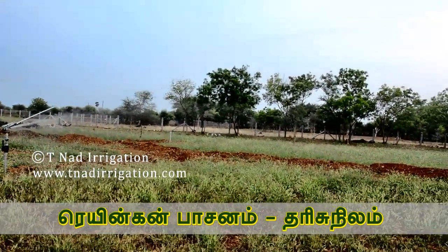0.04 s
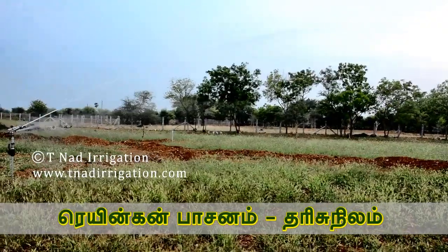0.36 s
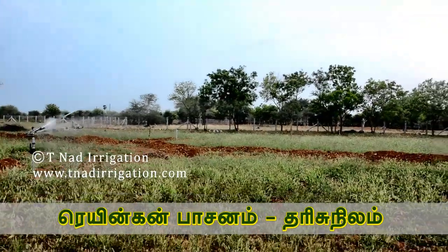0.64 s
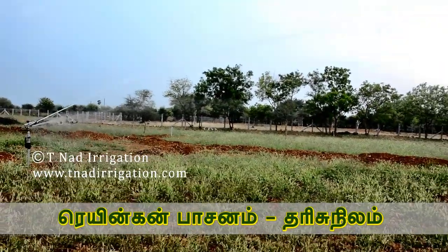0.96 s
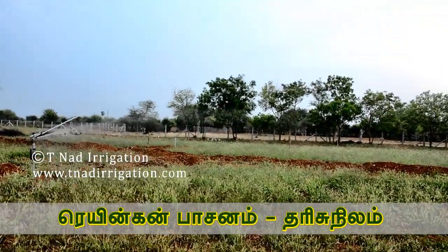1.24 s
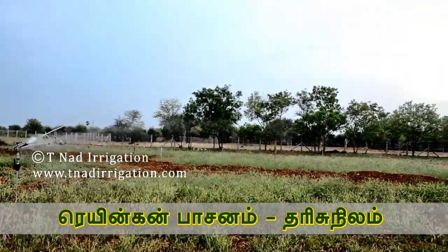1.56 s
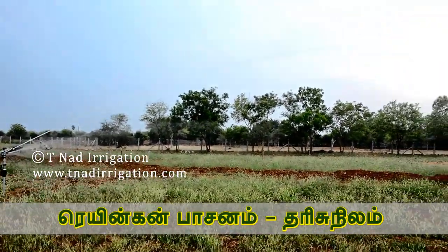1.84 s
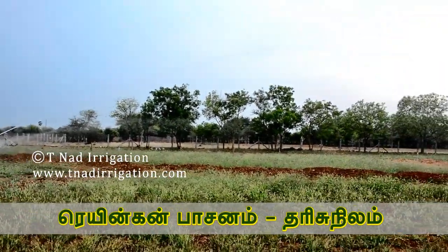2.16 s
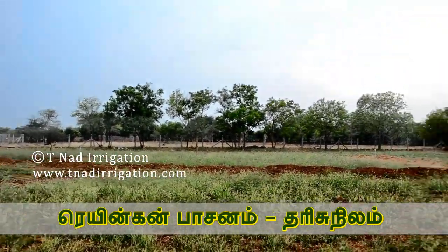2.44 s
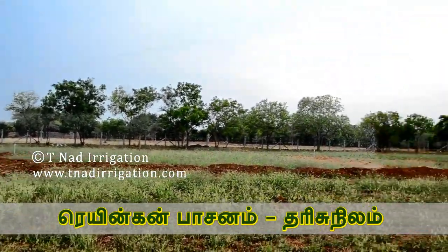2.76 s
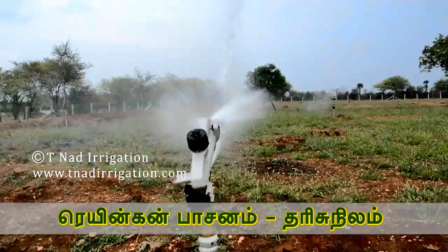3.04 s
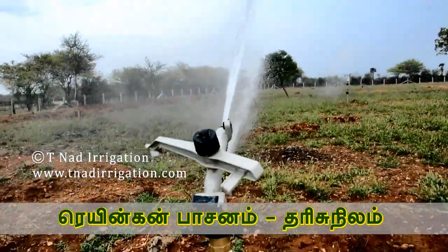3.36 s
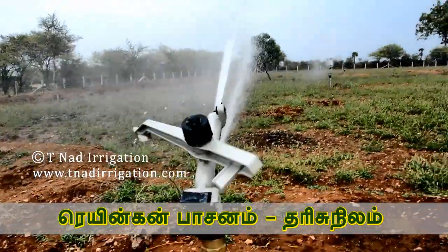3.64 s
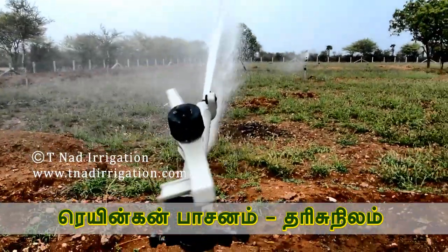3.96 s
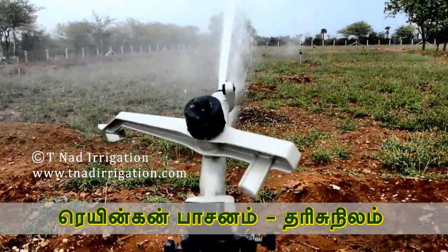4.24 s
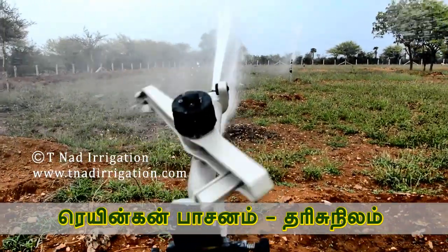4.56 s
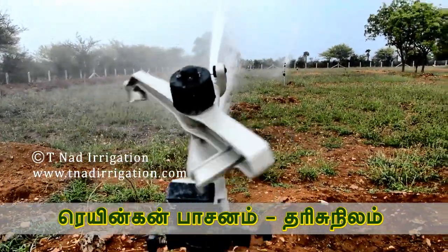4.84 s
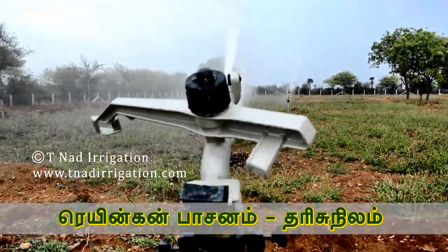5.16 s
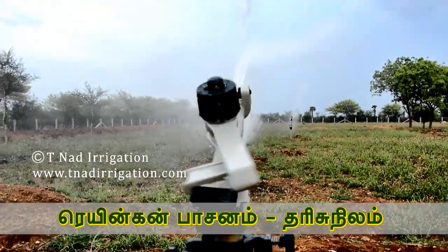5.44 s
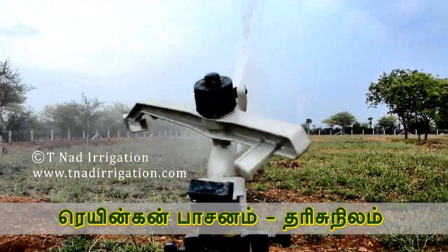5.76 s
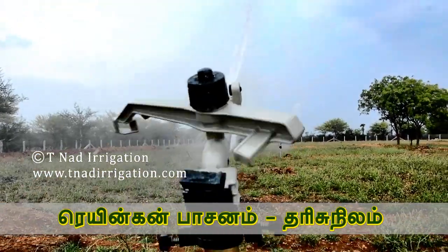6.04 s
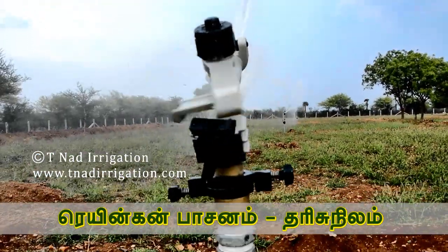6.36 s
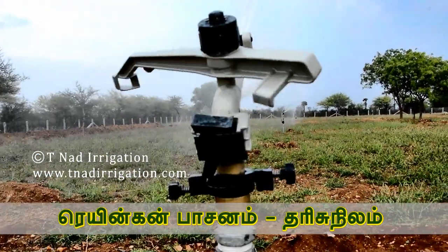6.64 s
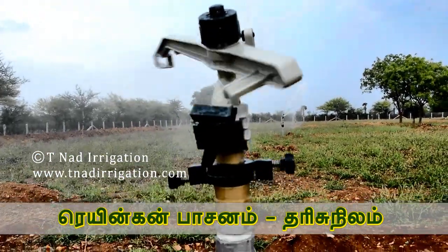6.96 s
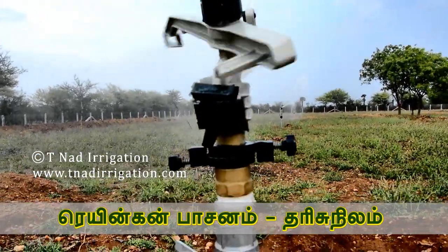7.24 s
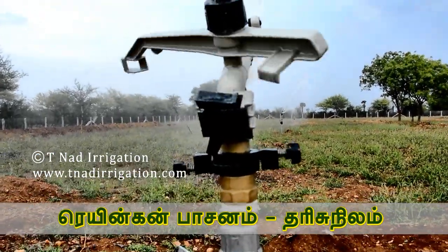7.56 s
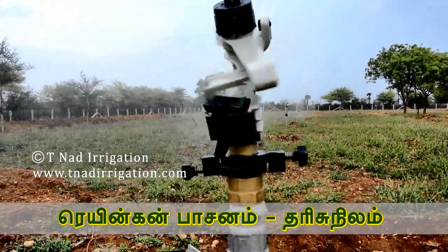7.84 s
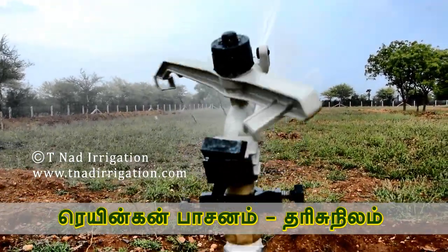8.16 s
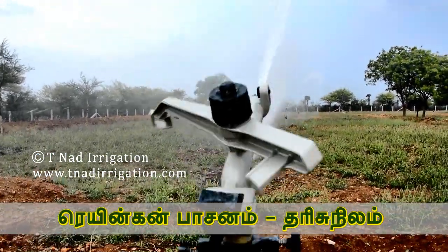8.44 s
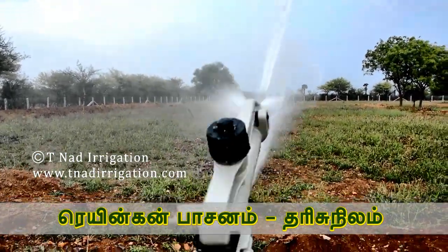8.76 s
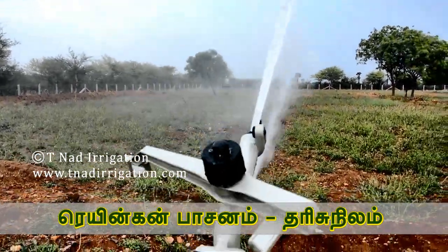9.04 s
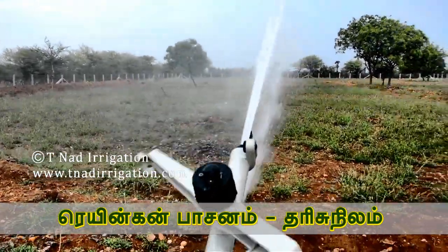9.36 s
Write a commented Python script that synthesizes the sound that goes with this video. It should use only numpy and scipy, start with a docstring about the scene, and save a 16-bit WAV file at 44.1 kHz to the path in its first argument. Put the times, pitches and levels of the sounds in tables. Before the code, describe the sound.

A large sprinkler waters an open field, its swinging arm ticking in a quick, even metallic rhythm over a soft, distant water hiss. A small bird trills faintly. After about three seconds the sound jumps right beside the sprinkler: the arm slams about twice a second with loud, ringing, slightly distorted clanks, the jet hisses and spatters, and wind rumbles on the microphone.

```python
"""A rain gun waters a field

The jet kicks a swinging arm out, and the arm slams back about twice a second. Each blow rings the
metal head and two long, pulsing tones. The jet hisses, small knocks come and go, and a bird trills.
We listen from across the grass and then, from 3.07 s, right beside the gun. There wind buffets the
microphone, and the blows overload it and briefly push the hiss down."""
import sys
import numpy as np
from scipy import signal
from scipy.fft import rfft, irfft
from scipy.io import wavfile
from scipy.ndimage import uniform_filter1d, map_coordinates

SR = 44100
rng = np.random.default_rng(int(sys.argv[2]) if len(sys.argv) > 2 else 0)


def waveform_to_disk(signal):
    """Save audio, clipped to [-1, 1], as 16-bit WAV at the path in sys.argv[1]."""
    frames = np.transpose(np.atleast_2d(signal))
    scaled = np.clip(frames, -1, 1) * 32767
    samples = np.round(scaled).astype(np.int16)
    wavfile.write(sys.argv[1], SR, samples)


N = 422919
TIME = np.arange(N) / SR

# the arm slams on its stop: (time [s], force [dB], body [dB], clank [dB], lower long tone [dB],
# upper long tone [dB]); body is the low part of the sound, clank the part at 3-4 kHz
ARM_SLAMS = [(0.364, 0, 4, 0, -33.5, -42), (0.819, -1.5, 4, 1, -38, -34.5), (1.278, 0, 3.5, -0.5, -32, -44),
             (1.733, 0, 1, 1, -45, -35), (2.193, -0.5, 3.5, 2.5, -40, -37), (2.647, -2, 5, 4.5, -34.5, -44),
             (3.209, -1, 0.5, 1, -24, -23), (3.684, 2, -2, 1.5, -29.5, -35),
             (4.16, 0, -1.5, -0.5, -19, -25.5), (4.636, -0.5, -1, 0, -24, -27),
             (5.112, 2.5, 1, 0.5, -24, -21.5), (5.589, 0, 0, 0.5, -18.5, -20.5),
             (6.067, -1.5, 0, -1.5, -20.5, -20.5), (6.544, 1, 0, -0.5, -27, -19.5),
             (7.022, 2, 2.5, -1.5, -34.5, -40), (7.503, 0, 0, 0.5, -26, -24.5),
             (7.976, 0.5, -1.5, 1.5, -28.5, -22.5), (8.454, 0, 1, 2.5, -31.5, -24),
             (8.928, 0.5, -2, 2, -23, -25.5), (9.402, 1.5, -4.5, 1, -25, -22.5)]
# the lighter kick between slams, heard only from afar: (time [s], force [dB])
ARM_KICKS = [(0.131, 0.5), (0.584, 0.5), (1.036, 0), (1.49, 0), (1.945, 0.5), (2.401, 0), (2.856, -1.5)]
# loose chatter of the arm: (time [s], force [dB])
ARM_CHATTER = [(3.158, -17.5), (3.619, -18.5), (6.643, -8), (6.663, -9), (6.671, -25), (6.684, -13.5),
               (6.745, -19), (8.785, -21)]
# noisy crack of a blow: (frequency [Hz], far slam [dB], far kick [dB], close slam [dB])
CRACK_COLOUR = [(60, -29, -34, -23), (300, -13, -18, 13), (710, -5.5, -22, 11.5), (1320, 3, 4, 25.5),
                (3020, 14, 3.5, 23), (6560, 7.5, -3, 21.5), (11200, 1, -11, 17.5), (15300, -9, -11, 13.5)]
# tones of the head: (pitch [Hz], time to fade 60 dB [s], far slam [dB], far kick [dB], close slam [dB])
HEAD_TONES = [(690.0, 0.076, -44.0, -60.0, -23.0), (1001, 0.051, -35, -37, -4.5),
              (1070, 0.065, -38, -40, -9), (1135, 0.07, -46, -42, -10), (1625, 0.06, -38, -50, -16),
              (1830, 0.05, -19, -26, -20), (1959, 0.053, -32, -45, -7), (3057, 0.085, -43, -25, -10),
              (3245, 0.055, -32, -35, -11.5), (3560, 0.04, -23, -23, -9), (3925, 0.1, -33, -30, -22),
              (4242, 0.05, -17, -51, -27), (4330, 0.13, -32, -41, -24.5),
              (4800.0, 0.064, -42.0, -41.0, -23.0), (5076.0, 0.03, -26.0, -59.0, -19.0),
              (5620.0, 0.03, -19.0, -36.0, -15.0), (5740.0, 0.047, -29.0, -26.0, -11.0),
              (6078, 0.13, -50, -45, -21), (6190, 0.14, -34, -55, -23),
              (6730.0, 0.042, -21.0, -58.0, -11.5), (7003.0, 0.035, -32.0, -56.0, -11.0),
              (7560.0, 0.056, -41.0, -35.0, -17.5), (8460, 0.17, -24, -59, -30),
              (8532.0, 0.058, -29.0, -43.0, -14.5), (9178, 0.12, -49, -54, -25),
              (9280, 0.08, -21, -60, -40), (9730.0, 0.053, -22.0, -35.0, -17.0),
              (11760, 0.07, -27, -49, -26), (12354.0, 0.064, -33.0, -48.0, -17.0),
              (13668, 0.1, -60, -55, -29)]
# long tones of the arm: (pitch [Hz], time to fade 60 dB [s])
ARM_TONES = [(2578, .54), (2824, .58)]
# how much the two sides of the microphone differ on a blow: (frequency [Hz], level [dB])
SIDE_COLOUR = [(1200, -59), (3500, -16.5), (9000, -21.0)]
# the close jet as the microphone moves round it: (time [s], roar [dB], spray [dB])
CLOSE_JET_LEVELS = [(3.51, -36.5, -30.5), (3.98, -34.5, -29.5), (4.94, -34, -28), (6.37, -34.5, -29.5),
                    (7.32, -34, -29), (8.28, -34.5, -27), (9.23, -34, -30.5)]
# tone colour of the jet, far and close: (frequency [Hz], level [dB])
FAR_JET_COLOUR = [(29, -48), (50, -17), (310, -7), (404, -6.5), (551, -4.5), (735, -2), (1110, -1.5),
                  (1470, -1.5), (1740, -3), (4240, -7.5), (6690, -12.5), (7190, -11), (7920, -13),
                  (15500, -10.5)]
CLOSE_JET_COLOUR = [(180, -28), (300, -6), (907, -6.5), (1140, -2), (1440, -4.5), (1640, 1.5), (2280, -5),
                    (2520, -4), (3280, -3), (3630, -7.5), (4280, -3.5), (5850, -4), (7250, -2.5),
                    (9760, -5.5), (15500, -4)]
# a peak and two dips that the head puts in the close hiss: (frequency [Hz], width [Hz], gain [dB])
HEAD_HUM = [(1116, 57, 5.5), (1670, 180, -4), (2820, 1200, -5)]
# a near echo of the hiss, shifting as the microphone moves: (time [s], delay [ms])
ECHO_DELAYS = [(3.2, 1.28), (3.8, 1.42), (5.2, 1.27), (5.6, 1.08), (6.5, 1.05), (6.9, 1.12), (7.9, .97),
               (8.4, 1.05), (9.1, 1.07), (9.4, 1.25)]
# faint ticks, thuds, rustles and arm bounces: (time [s], level [dB], centre [Hz], fade time [s])
SMALL_KNOCKS = [(0.164, -47, 450, 0.0097), (0.43, -34, 2600, 0.0083), (0.753, -37.5, 546, 0.0083),
                (0.872, -35, 2790, 0.011), (2.738, -27, 2430, 0.0037), (2.758, -39, 700, 0.028),
                (2.79, -37.5, 603, 0.016), (2.986, -43, 550, .018), (3.583, -14, 9000, .0007),
                (3.877, -24, 9000, .001)]
# strength of the wind on the microphone: (time [s], level [dB])
GUSTS = [(3.1, -39), (3.5, -33), (3.58, -52), (3.82, -59.0), (4.38, -35.5), (4.94, -52), (5.1, -32),
         (5.34, -37), (5.74, -27.5), (5.82, -37.5), (6.06, -34), (6.14, -41), (6.3, -31.5), (7.02, -43.5),
         (7.1, -63), (7.26, -39), (8.78, -43), (9.1, -42.5), (9.26, -56), (9.58, -54.1)]
# tone colour of the wind: (frequency [Hz], level [dB])
GUST_COLOUR = [(12, -57), (20, -21), (141, 2), (195, -1), (225, -1), (282, -7), (506, -20), (600, -14),
               (780, -46), (1320, -120)]
# whistles in the far hiss: (start [s], end [s], start pitch [Hz], end pitch [Hz], width [Hz], level [dB])
HISS_WHISTLES = [(0.273, 0.394, 1350, 1620, 190, -47), (0.367, 0.56, 1900, 1620, 300, -47.5),
                 (0.799, 1.1, 1400, 1390, 18, -51), (.9, 1.193, 180, 249, 40, -60),
                 (1.2, 1.42, 1350, 1550, 290, -47), (1.331, 1.55, 1900, 1750, 250, -48),
                 (1.2, 2.203, 1195, 1210, 19, -55), (2.151, 2.655, 1600, 1564, 19, -57)]
# loudness of the bird's trill: (time [s], level [dB])
BIRD_LEVELS = [(1.8, -58), (2.1, -57), (2.5, -51), (2.85, -45), (3.0, -54)]

FAR_SLAM, FAR_KICK, CLOSE_SLAM = 0, 1, 2  # kinds of blow: each picks a level column
STEP_CLOSE_S, LEAD_S = 3.07, 0.02  # when we move close; how early a blow's sound starts
KICK_TONES_DB = -58  # a kick hardly wakes the long tones
FAR_ROAR_DB, FAR_SPRAY_DB = -47.5, -45
BUFFET_PER_S, BUFFET_DB = 18, 2.1  # swirls within a gust, felt on both sides
GAIN_CONTROL_DB, GAIN_CONTROL_S = -11, 0.14  # level at which the power is halved; memory
TOP_HZ = 15750


def arm():
    """The swinging arm strikes again and again: slams, kicks and loose chatter."""
    out = np.zeros(N)
    for s, force_db, body_db, clank_db, *tones_db in ARM_SLAMS:
        if s < STEP_CLOSE_S:
            hit = blow(FAR_SLAM, body_db, clank_db, treble_db=1.3,
                       crack_db=0.5, ring_db=-2, crack_s=0.01, rebound_db=-12)
        else:
            hit = blow(CLOSE_SLAM, body_db, clank_db, treble_db=0.5,
                       crack_db=1.76, ring_db=1.2, crack_s=0.012, rebound_db=-12.5)
        add(out, s - LEAD_S, undb(force_db) * hit)
        add(out, s, long_tones(tones_db))
    for s, force_db in ARM_KICKS:
        hit = blow(FAR_KICK, body_db=0, clank_db=0.5, treble_db=0,
                   crack_db=0.9, ring_db=-1.1, crack_s=0.0088, rebound_db=-19)
        add(out, s - LEAD_S, undb(force_db) * hit)
        add(out, s, long_tones([KICK_TONES_DB, KICK_TONES_DB]))
    for s, force_db in ARM_CHATTER:
        hit = blow(CLOSE_SLAM, body_db=-4, clank_db=-0.5, treble_db=-10,
                   crack_db=-4, ring_db=-7, crack_s=0.0097, rebound_db=-15)
        add(out, s - LEAD_S, undb(force_db) * hit)
    return out


def blow(kind, body_db, clank_db, treble_db, crack_db, ring_db, crack_s, rebound_db):
    """One blow: the arm's tip cuts the jet, the metal faces rattle together, the arm bounces."""
    size = 16384
    t = np.arange(size) / SR - LEAD_S
    after, hz = np.maximum(t, 0), bins(size)
    tone = [(1300, body_db), (2000, 0), (3000, clank_db), (4000, clank_db), (6000, treble_db)]
    lead = undb(-13.5) * np.exp(np.minimum(t, 0) / 0.0053) * (t < 0)
    tail = undb(-19) * np.exp(-after / .024)
    first_contact = undb(-1.5) * np.exp(-after / 0.0011)
    rattle = (first_contact + np.exp(-after / crack_s) + tail) * (t >= 0)
    burst = unit((lead + rattle) * rng.standard_normal(size)) / np.sqrt(size)
    crack = shape(burst, colour(np.array(CRACK_COLOUR)[:, [0, 1 + kind]], hz) * colour(tone, hz))
    out = undb(crack_db) * crack + undb(ring_db) * head_ring(kind, tone, after)
    # two softer bounces mostly knock the hollow body
    soft = [(1000, body_db - 3), (1100, body_db + 6), (1700, -9),
            (3100, clank_db + 2), (4000, -7), (9000, -9)]
    for lag_s, drop_db in ((.023, 0), (.064, -9)):
        since_bounce = np.maximum(t - lag_s - rng.random() / 150, 0)
        out += undb(rebound_db + drop_db) * head_ring(kind, soft, since_bounce)
    return out


def head_ring(kind, tone, t):
    """The head rings; the arm lands a little differently each time and a film of water detunes it."""
    modes = np.array(HEAD_TONES)
    chance = rng.standard_normal((len(modes), 3))
    gain = undb(modes[:, 2 + kind] + 3.45 * chance[:, 0]) * colour(tone, modes[:, 0])
    hz = modes[:, :1] + 7 * chance[:, 1:2]
    tones = beating_pair(hz, fade_s=modes[:, 1:2], phase=chance[:, 2:], t=t, partner=.45)
    attack = 1 - np.exp(-t / .0006)
    return gain @ tones * attack


def long_tones(levels_db):
    """Two slowly fading tones of the arm sing on after the blow."""
    t = np.arange(SR // 2) / SR
    return sum(undb(db) * beating_pair(hz, fade_s, rng.random(), t, partner=1)
               for (hz, fade_s), db in zip(ARM_TONES, levels_db))


def beating_pair(hz, fade_s, phase, t, partner):
    """A tone and a slightly higher partner drift in and out of step, so they pulse as they fade."""
    beat = 2 * np.pi * 1.9 * t / fade_s
    turn = 2 * np.pi * (hz * t + phase)
    return (np.sin(turn) - partner * np.sin(turn + beat)) * np.exp(-np.log(1000) * t / fade_s)


def jet(roar_db, spray_db, gain, drop_db, flutter_db, surge_db, side_db):
    """The stream roars and breaks into fluttering spray; single drops tick through it."""
    high = 1 / (1 + (4500 / bins(N)) ** 8)  # spray lies above 4500 Hz, roar below
    ticks = rng.random(N) < 700 / SR  # about 700 drops a second
    sizes = undb(4.5 * np.minimum(rng.exponential(size=N), 3.5))
    drops = ticks * sizes * rng.choice([-1, 1], N)
    roar = noise(gain * (1 - high)) * undb(roar_db + flutter_db * wander(60))
    spray = unit(shape(rng.standard_normal(N) + undb(drop_db) * unit(drops), gain * high))
    spray *= undb(spray_db + flutter_db * wander(200))
    mist = noise(gain) * undb(roar_db + side_db)
    return stereo((roar + spray) * undb(surge_db * wander(10)), mist)


def with_echo(hiss):
    """A weak, shifting echo lifts some pitches of the hiss and thins others."""
    lag_ms, = curves(ECHO_DELAYS)
    late = np.arange(N) - lag_ms * SR / 1000
    return hiss + .24 * np.array([map_coordinates(side, [late], order=3) for side in hiss])


def small_knocks():
    """Short bursts of noise: faint ticks, dull thuds, rustles, arm bounces and an odd droplet click."""
    out, t = np.zeros(N), np.arange(SR // 8) / SR
    for s, db, hz, decay_s in SMALL_KNOCKS:
        band = 1 / (1 + (np.log(bins(len(t)) / hz) / 0.42) ** 2)
        add(out, s, undb(db) * noise(band, len(t)) * np.exp(-t / decay_s))
    return out


def wind():
    """Gusts break into swirls that buffet each side of the microphone, mostly on its own."""
    gust_db, = curves(GUSTS)
    gain = colour(GUST_COLOUR, bins(N)) / (1 + (bins(N) / 600) ** 4)
    shared, left, right = (noise(gain) * undb(3 * wander(36)) for _ in range(3))
    sides = np.array([0.23 * shared + 0.58 * left, 0.27 * shared + 0.82 * right])
    return undb(gust_db + BUFFET_DB * wander(BUFFET_PER_S)) * sides


def whistles():
    """Faint, narrow bands of noise swell, glide and fade."""
    out = np.zeros(N)
    for start, end, from_hz, to_hz, width_hz, db in HISS_WHISTLES:
        progress = np.linspace(0, 1, int((end - start) * SR))
        turn = 2 * np.pi * np.cumsum(from_hz + (to_hz - from_hz) * progress) / SR
        waver = sum(wander(width_hz)[:len(turn)] * wave(turn) for wave in (np.cos, np.sin))
        add(out, start, undb(db) * unit(waver) * np.sin(np.pi * progress))
    return out


def bird():
    """A small bird sings a fast trill of thin, arched notes."""
    db, = curves(BIRD_LEVELS)
    note = (TIME * 21.2) % 1  # runs from 0 to 1 in each note
    hz = 7350 - 1300 * (note - .55) ** 2 + 25 * wander(16)
    singing = (TIME > BIRD_LEVELS[0][0]) & (TIME < BIRD_LEVELS[-1][0])
    return singing * undb(db) * np.sin(np.pi * note) ** 2 * np.sin(2 * np.pi * np.cumsum(hz) / SR)


def undb(db):
    """Turn decibels into a gain."""
    return 10 ** (np.asarray(db) / 20)


def unit(x):
    """Scale to an average power of one."""
    return x / np.sqrt(np.mean(x ** 2))


def curves(rows):
    """Join a table's points into one line in time for each value column."""
    s, *columns = np.transpose(rows)
    return [np.interp(TIME, s, c) for c in columns]


def bins(size):
    """The frequencies in a spectrum of this many samples."""
    return np.maximum(np.arange(size // 2 + 1) * SR / size, 1)


def colour(points, hz):
    """Join (frequency [Hz], level [dB]) points into a gain for each frequency."""
    f, db = np.transpose(points)
    return undb(np.interp(np.log(hz), np.log(f), db))


def shape(x, gain):
    """Filter by a gain for each frequency."""
    return irfft(rfft(x) * gain, x.shape[-1])


def noise(gain, size=N):
    """Filtered noise with a power of one."""
    return unit(shape(rng.standard_normal(size), gain))


def wander(rate):
    """A smooth random line that heads for a new value `rate` times a second."""
    hold = int(SR / rate)
    steps = np.repeat(rng.standard_normal(N // hold + 1), hold)
    return unit(uniform_filter1d(uniform_filter1d(steps, hold), hold)[:N])


def add(out, s, x):
    """Mix a sound in at s seconds."""
    i = int(s * SR)
    out[i:i + len(x)] += x[:max(N - i, 0)]


def stereo(mid, side):
    """Left and right from what they share and how they differ."""
    return np.array([mid + side, mid - side])


def scene():
    """Far off the gun stands a little to the left; close up it is straight ahead."""
    hz = bins(N)
    humming = undb(sum(db / (1 + (2 * (hz - f) / width) ** 2) for f, width, db in HEAD_HUM))
    low_cut = 1 / (1 + (70 / hz) ** 4)
    far_jet = jet(FAR_ROAR_DB, FAR_SPRAY_DB, colour(FAR_JET_COLOUR, hz) * low_cut,
                  drop_db=-7, flutter_db=1, surge_db=-0.03, side_db=-16)
    close_jet = jet(*curves(CLOSE_JET_LEVELS), colour(CLOSE_JET_COLOUR, hz) * humming,
                    drop_db=-1.5, flutter_db=1.35, surge_db=0.82, side_db=-35)
    blows = arm() + small_knocks()
    blows = stereo(blows, shape(blows, 1j * colour(SIDE_COLOUR, hz)))
    # from afar the left side is louder and the right arrives 0.55 samples later
    far = (blows + far_jet + bird() + whistles()) * undb([[.7], [-.7]])
    far = shape(far, np.exp(-2j * np.pi * hz / SR * np.array([[0], [.55]])))
    close = blows + with_echo(close_jet) + wind()
    closeness = np.clip((TIME - STEP_CLOSE_S) / 0.0097 + .5, 0, 1)
    return (1 - closeness) * far + closeness * close


def record(dry):
    """The gain drops after each loud blow and creeps back; peaks still clip; the top treble is cut."""
    memory = np.exp(-1 / (GAIN_CONTROL_S * SR))
    power = signal.lfilter([1 - memory], [1, -memory], np.mean(dry ** 2, axis=0))
    clipped = np.clip(dry / np.sqrt(1 + power / undb(GAIN_CONTROL_DB) ** 2), -1, 1)
    return signal.sosfilt(signal.ellip(14, .1, 80, TOP_HZ, fs=SR, output="sos"), clipped)


dry = scene()
out = record(dry)
waveform_to_disk(out)
```